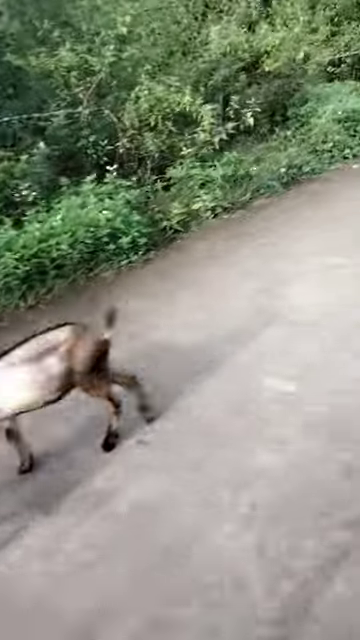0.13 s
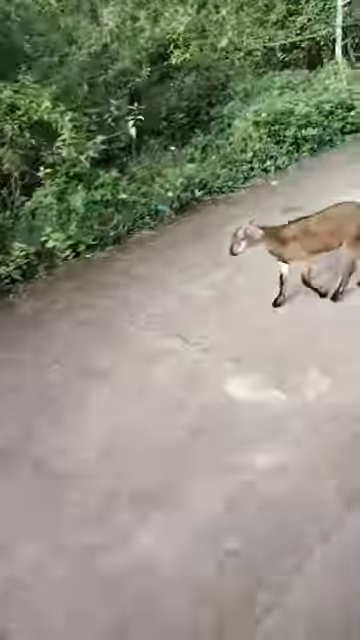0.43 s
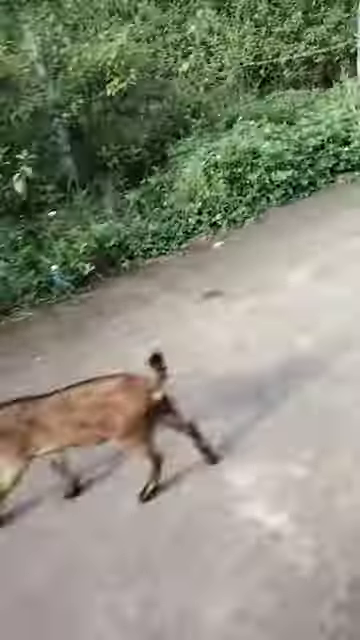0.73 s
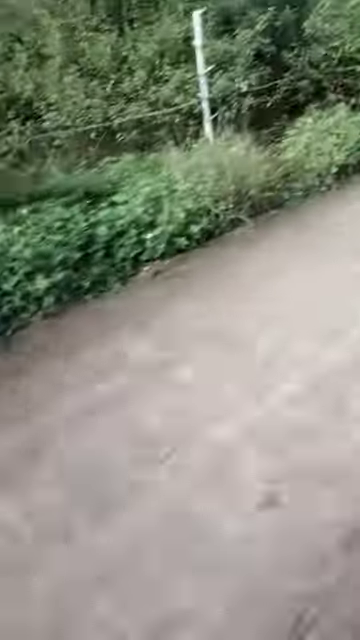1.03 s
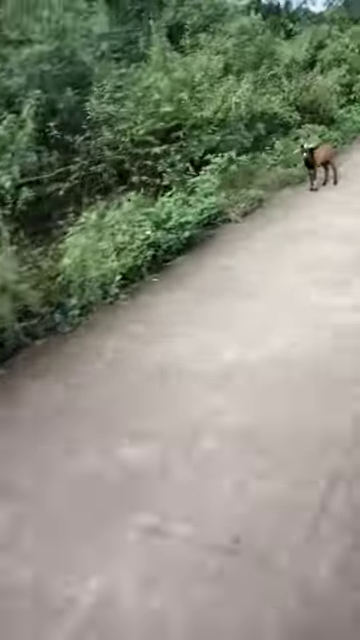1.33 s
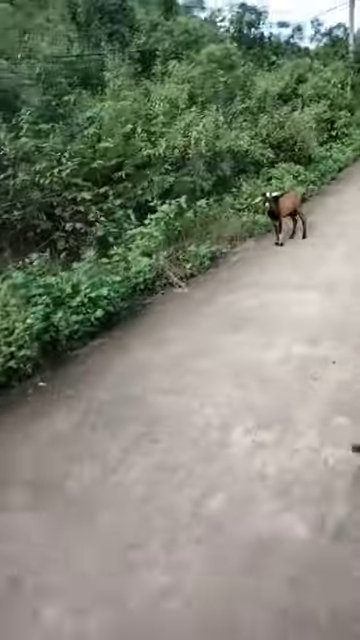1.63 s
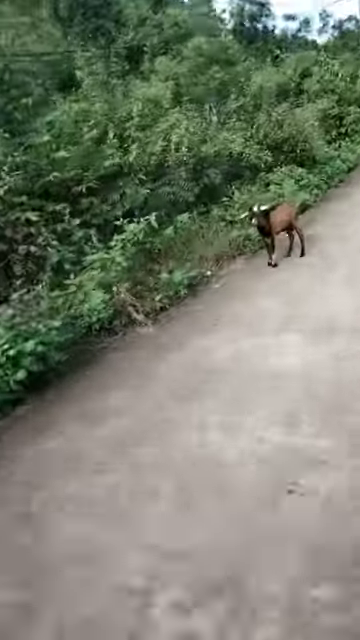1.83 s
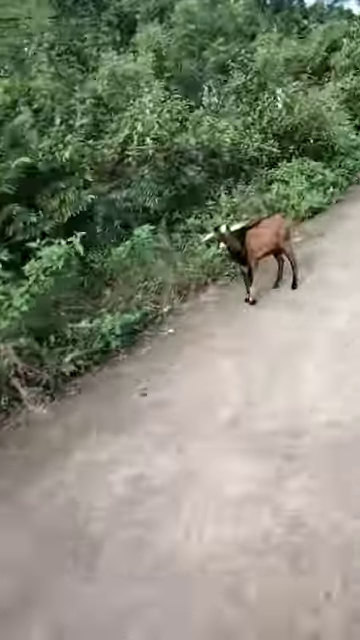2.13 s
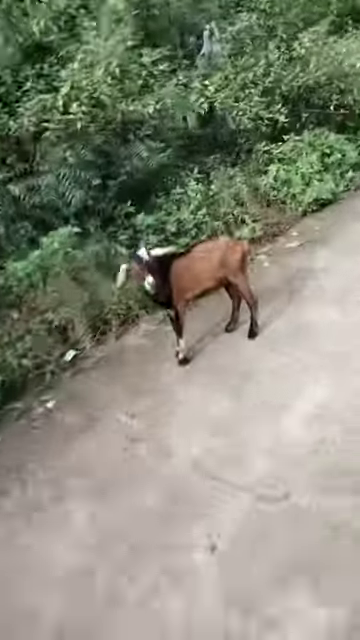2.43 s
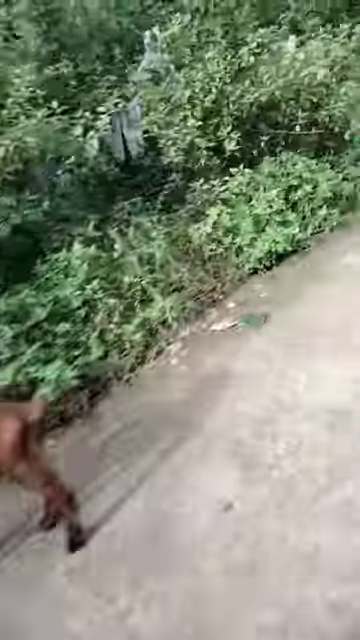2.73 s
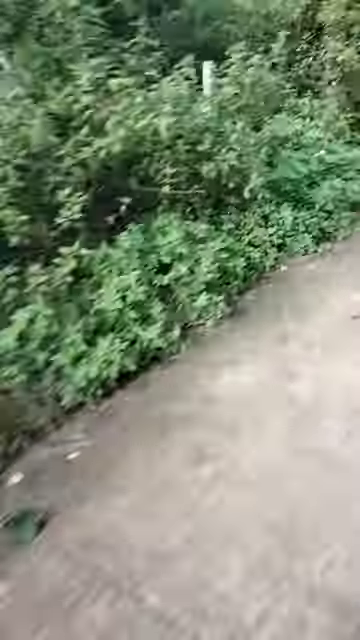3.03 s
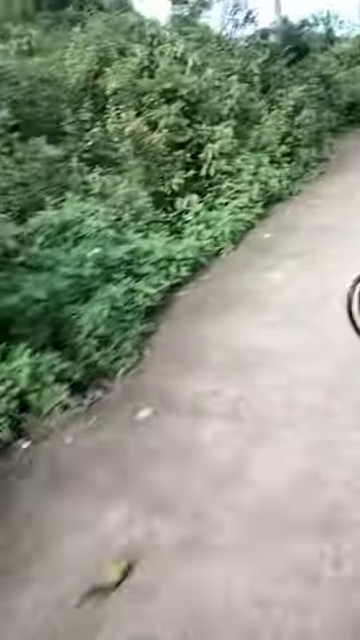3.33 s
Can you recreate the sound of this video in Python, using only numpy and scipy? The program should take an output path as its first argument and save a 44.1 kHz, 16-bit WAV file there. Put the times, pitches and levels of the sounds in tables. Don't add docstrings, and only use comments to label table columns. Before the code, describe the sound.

Wind buffeting, deep and uneven, fills the whole 3.5 seconds at a rider's phone, easing near 0.33, heavier around 0.9-1.4, softer about 1.8-2.5, then strong again from 2.6 with brief snaps. Underneath, a slow motorbike thumps about twenty times a second with faint clatter and gear whine, swelling after 2.6. Tyres hiss thinly; stones tick, clearest near 0.32, 2.14, 2.4 and 3.43.

```python
import sys
import numpy as np
from scipy import signal
from scipy.fft import rfft, irfft
from scipy.io import wavfile
from scipy.ndimage import uniform_filter1d

SR = 44100
rng = np.random.default_rng(int(sys.argv[2]) if len(sys.argv) > 2 else 0)


def master_out(mix):
    frames = np.transpose(np.atleast_2d(mix))
    ceiling = np.clip(frames, -1, 1)
    pcm = np.round(ceiling * 32767).astype(np.int16)
    wavfile.write(sys.argv[1], SR, pcm)


def magnitude_from_level(level_db):
    exponent = np.asarray(level_db, float) / 20
    return 10 ** exponent


N = 153027

# time in seconds, level in dB.
ROLLING = [(.1, -44.5), (.6, -47), (1.0, -44.5), (1.35, -47.5), (1.8, -47), (2.3, -44), (2.8, -44),
           (3.47, -44.5)]
# frequency in Hz, density in dB per Hz.
HISS_COLOUR = [(2500, -13.5), (4300, -20), (5000, -19.5), (7000, -12), (8800, -7), (10800, -13),
               (12500, -16), (15600, -13.5)]
# start in seconds, peak in dB, low ring in dB, length in seconds.
STONES = [(0.308, -31.5, -23, 0.0039), (0.3235, -21, -11.5, 0.0083), (0.332, -38, -13, 0.005),
          (0.613, -37, -10, 0.0051), (0.647, -29, -17, 0.0035), (0.68, -28, -42, 0.0057),
          (0.829, -31, -24, 0.0052), (1.107, -27, -5.5, 0.006), (1.261, -28, -12, 0.0048),
          (1.3763, -26, -4, 0.0089), (1.666, -35, -2, 0.0055), (1.774, -29.5, -5, 0.0034),
          (1.912, -46, 0, 0.005), (2.138, -21.5, -12.5, 0.0064), (2.155, -32, -14, 0.0054),
          (2.315, -29.5, -12, 0.005), (2.333, -28.5, -26, 0.0067), (2.372, -45, -12, 0.0061),
          (2.3993, -19.5, -7.5, 0.0049), (2.846, -37, -27, 0.0045), (3.16, -26.5, -32, 0.0068),
          (3.22, -33, -14, 0.0059), (3.284, -29.5, -12, 0.0068), (3.4302, -24.5, -6, 0.0063)]
# frequency in Hz, width in Hz, level in dB.
EXHAUST_MODES = [
    (45.7, 17, 5),
    (102, 56, 8),
    (140.4, 14, -12.5),
]
# frequency in Hz, width in Hz, level in dB, throb in dB, share of mesh swell.
GEAR_WHINES = [
    (1474, 39, -53.5, 1.5, 0.99),
    (1798, 83, -58.5, -1, 0.61),
    (2204, 72, -60.5, 1.0, 1),
    (4240, 240, -69, 3.5, 0.47),
    (652, 210, -52.5, 2.5, 0.077),
]
# centre in seconds, whine lift in dB, half length in seconds.
MESH_SWELLS = [(1.81, 3, .03), (2.066, 7, .03), (2.598, 4, 0.021), (2.706, 9.5, 0.033), (2.835, 4, 0.0092),
               (3.018, 9, .04), (3.126, 11.5, 0.027), (3.205, 5, 0.021), (3.277, 7, 0.015)]
# frequency in Hz, density in dB per Hz.
CLATTER_COLOUR = [(300, 3.5), (900, 1), (1600, 0.5), (2300, -5), (2600, -4), (4250, -10.5), (4700, -25.5),
                  (7000, -42)]
# time in seconds, exhaust level in dB.
THROTTLE_LEVEL = [(.1, 1.5), (.28, 4), (.4, -3), (.55, 2.5), (.8, -1), (1.3, 0.5), (1.7, -3), (2.0, -0.5),
                  (2.3, -2.5), (2.6, 2.5), (2.9, 2.5), (3.2, 0.5), (3.47, 2.5)]
# time in seconds, level in dB.
LOAD_LEVEL = [(.1, 2), (.6, -0.5), (1.2, 2), (1.7, 1), (2.1, 3), (2.6, 4), (3.0, 2), (3.47, 3.5)]
# time in seconds, level in dB, brightness in dB.
GUSTS = [(.1, -26, -4.5), (.28, -22, -10), (.33, -34, 10), (.45, -25.5, -5.5), (.66, -25, -10.5),
         (.9, -20, -12.5), (1.2, -20.5, 2.5), (1.44, -21.5, -1.5), (1.5, -25, 3), (1.8, -26, 5.5),
         (2.1, -27.5, 7.5), (2.42, -27.5, 5.5), (2.65, -21, -4), (2.9, -20.5, -2), (3.12, -21.5, -3),
         (3.33, -23.5, 2.5), (3.43, -23, 5.5), (3.47, -22.5, -10)]
# centre in seconds, treble lift in dB, bass lift in dB,
# half length in seconds.
PORT_BUFFETS = [(0.117, 8, 0.5, 0.0089), (0.169, 7.5, 2.5, 0.012), (0.261, 6.5, 5, 0.009),
                (0.623, 1.5, 7.5, 0.01), (0.645, 9, 4, 0.014), (0.844, 5.5, -6, 0.008),
                (1.056, 4, 8, 0.011), (1.208, 0, -2.5, 0.005), (1.51, 4, 11.5, 0.008),
                (1.585, 6, 18, 0.0058), (1.756, 4.5, -2, 0.0081), (1.92, 5.5, -15, 0.019),
                (2.023, 6, 0, 0.016), (2.27, 2, 8, 0.0082), (2.464, 3, -1, 0.0062), (2.568, 6, -8, 0.007),
                (3.074, 8.5, -2, 0.0065), (3.185, 7, -2, 0.0047), (3.376, -1, 6.5, 0.0063),
                (3.462, 12, 13, 0.0043), (0.239, 7.5, 4, 0.018), (0.434, 11, 7.5, 0.013),
                (0.72, 5, 5, 0.0067), (0.752, 13.5, 6.5, 0.0087), (0.791, 13.5, 8.5, 0.013),
                (0.929, 4, 6, 0.014), (0.995, 6, 4, 0.02), (1.122, 9, 5, 0.0065), (1.175, 10.5, -3, 0.0073),
                (1.257, 7, 4.5, 0.018), (1.303, 9, -1, 0.0048), (1.339, 11.5, 12, 0.017),
                (1.404, 11, 2.0, 0.0054), (1.431, 12.5, 5, 0.0082), (1.711, 6.5, 5.5, 0.024),
                (1.833, 5.5, 2, 0.021), (2.131, 8, 10.5, 0.018), (2.499, 8.5, 16, 0.015),
                (2.613, 6, 2, 0.022), (2.653, 11.5, 10, 0.009), (2.733, 4.5, 6, 0.012),
                (2.791, 7.5, 10.5, 0.0063), (2.833, 0.5, -0.5, 0.016), (2.865, 7.5, 9, 0.0046),
                (2.971, 5, 7, 0.014), (3.038, 10, 6, 0.013), (3.131, 9, 7, 0.012), (3.207, 7, 1, 0.019),
                (3.261, 11, 9.5, 0.01), (3.303, 9.5, 6.5, 0.0098)]
# start in seconds, peak in dB, length in seconds.
EDDY_SNAPS = [(0.422, -29, 0.0043), (0.713, -35, 0.0045), (0.788, -31, 0.0036), (1.11, -27, 0.005),
              (1.165, -27, 0.0046), (1.249, -32, 0.005), (1.291, -27, 0.0046), (1.332, -27, 0.0055),
              (1.39, -36, 0.0055), (1.427, -21, 0.005), (1.718, -36, 0.0046), (1.829, -30, 0.005),
              (1.915, -28, 0.005), (2.028, -25, 0.005), (2.124, -29, 0.005), (2.572, -28, 0.0059),
              (2.595, -22, 0.005), (2.65, -24, 0.0056), (2.789, -23, 0.0057), (2.96, -29, 0.0059),
              (3.052, -25, 0.0057), (3.182, -37, 0.0043), (3.302, -26, 0.005)]
# frequency in Hz, density in dB per Hz.
WIND_COLOUR = [(10, -9), (22, 0.5), (42, 4), (65, -2.5), (125, -2.5), (300, -11), (500, -17.5),
               (1400, -43.5)]
# frequency in Hz, density in dB per Hz.
EDDY_COLOUR = [(15, 9), (40, 10), (130, 4), (350, -6.5), (800, -21.5), (1500, -63), (3000, -73)]


def noise():
    return rng.standard_normal(N)


def level(x, db):
    return x * magnitude_from_level(db) / np.sqrt(np.mean(x ** 2))


def curve(rows, axis=1):
    rows = np.array(rows)
    return np.interp(np.arange(N) / SR, rows[:, 0], rows[:, axis])


def colour(x, rows):
    hz, db = np.array(rows).T
    f = np.arange(N // 2 + 1) * SR / N + 1
    return irfft(rfft(x) * magnitude_from_level(np.interp(np.log(f), np.log(hz), db)), N)


def band(x, hz, width_hz):
    return signal.lfilter(*signal.iirpeak(hz, hz / width_hz, SR), x)


def even(x, span_s):
    return x / np.sqrt(uniform_filter1d(x ** 2, int(span_s * SR)) + 1e-12)


def walk(rate):
    hold = int(SR / rate)
    steps = np.repeat(noise()[:N // hold + 1], hold)
    w = uniform_filter1d(uniform_filter1d(steps, hold), hold)[:N]
    w = w - uniform_filter1d(w, 4 * hold)
    return w / w.std()


def clicks(rate, spread_db):
    chance, sign, size = rng.random((3, N))
    return (chance < rate / SR) * np.sign(sign - .5) * magnitude_from_level(-spread_db * np.log(size + 0.00079))


def bursts(rows, db, rise):
    t, env = np.arange(N) / SR, np.zeros(N)
    for row, d in zip(rows, db):
        i = int(row[0] * SR)
        u = (t[i:i + SR // 5] - t[i]) / max(row[-1], .001)
        fall = np.exp(-u ** 2.1) + 0.13 * np.exp(-u / 3)
        env[i:i + SR // 5] += magnitude_from_level(d) * (1 - np.exp(-u / rise)) * fall
    return env


def bell(centre_s, half_s):
    return np.exp(-((np.arange(N) / SR - centre_s) / half_s) ** 2)


def port(x):
    shaped = colour(x, [(800, -32)] + list(HISS_COLOUR))
    return shaped + band(shaped, 9000, 1800)


def tyre_hiss():
    grains = np.abs(clicks(rate=280, spread_db=4))
    grit = signal.lfilter([1], [1, -np.exp(-1 / (0.0033 * SR))], grains)
    return level(port(noise()), 0) + level(port(grit * noise()), -4.5)


def stones():
    rows = np.array(STONES)
    peak_db, ring_db = rows[:, 1], rows[:, 1] + rows[:, 2] + 5
    rattle = even(band(port(noise()), 7500.0, 6400.0), 0.0039) * magnitude_from_level(-4.5 + 1.26 * walk(500))
    ring = band(noise(), 1400, 260.0)
    buzz = 0.16 * band(noise(), 3440.0, 860.0)
    ring = even(ring + buzz, 0.0053)
    ticks = rattle * bursts(rows, peak_db, rise=0.17) + ring * bursts(rows, ring_db, rise=1.0)
    return ticks - 0.47 * band(ticks, 5650.0, 1800.0)


def tyres():
    hiss, ticks = tyre_hiss(), stones()
    return hiss * magnitude_from_level(curve(ROLLING) + 0.28 * walk(11.36) + 1.0 * walk(45.19) + 2.0) + ticks


def valve_clatter(phase):
    decay = np.exp(-(phase % 1) / 2.56)
    return level(decay * magnitude_from_level(1.1 * walk(30.18)) * colour(noise(), CLATTER_COLOUR), -45.5)


def gear_whine(phase):
    mesh_db = sum(db * bell(s, max(half, .005)) for s, db, half in MESH_SWELLS)
    out = 0
    for hz, width_hz, db, throb_db, share in GEAR_WHINES:
        tone = even(band(band(noise(), hz, width_hz), hz, 1.05 * width_hz), 0.054)
        throb = throb_db * (walk(25.02) + 1.0 * np.sin(np.pi * phase))
        out = out + level(tone * magnitude_from_level(throb + share * mesh_db), db)
    return out


def exhaust(phase):
    pulses = np.diff(np.floor(phase), prepend=0) * magnitude_from_level(2.5 * walk(25))
    pipe = sum(magnitude_from_level(db) * band(band(pulses, hz, w), hz, w) for hz, w, db in EXHAUST_MODES)
    return level(pipe, -30) * magnitude_from_level(curve(THROTTLE_LEVEL))


def engine():
    firing_hz = 20.21 * (1 + 0.02956 * walk(3))
    phase = np.cumsum(firing_hz) / SR
    thump = exhaust(phase)
    mechanism = valve_clatter(phase) + gear_whine(phase)
    return mechanism * magnitude_from_level(curve(LOAD_LEVEL)) + thump


def turbulence():
    air = colour(noise(), list(WIND_COLOUR) + [(3000, -77)])
    eddies = colour(clicks(rate=120, spread_db=3.5), EDDY_COLOUR)
    return level(air, 0) + level(eddies, -5)


def buffeting():
    gust = curve(GUSTS) - np.mean(curve(GUSTS))
    brightness = curve(GUSTS, axis=2)
    bells = [bell(s, max(half, .004)) for s, _, _, half in PORT_BUFFETS]
    lift_high, lift_low = (1.18 * np.array(PORT_BUFFETS)[:, k] @ bells for k in (1, 2))
    spectrum = rfft(turbulence())
    octaves = np.log2((np.arange(N // 2 + 1) * SR / N + 1) / 16)
    flutter, ripple, out = walk(22.03), walk(50), 0
    for step in range(9):
        high, mid = min(step / 6, 1), np.clip((step - 2) / 2, 0, 1)
        gust_gain = 1 + (1.99 - 1) * high
        db = gust_gain * gust + high ** 2 * brightness
        db = db + (1 - mid) * lift_low + (mid + 0.29 * high ** 3) * lift_high
        db = db + (0.25 + 0.26 * high) * flutter + (0.5 + 2.0 * high) * ripple + 0.6 * walk(14)
        window = np.cos(np.pi / 2 * np.clip(octaves - step, -1, 1)) ** 2
        part = irfft(spectrum * window, N)
        out = out + magnitude_from_level(db) * part.std() * even(part, 0.035 + 0.091 * (1 - mid))
    return level(out, -19.5)


def snaps():
    snap_hz = 845
    crack = even(band(band(noise(), snap_hz, 1200.0), snap_hz, 1800.), 0.0027)
    crack = signal.sosfilt(signal.butter(4, 1900, fs=SR, output="sos"), crack)
    return crack * bursts(EDDY_SNAPS, np.array(EDDY_SNAPS)[:, 1] - 7.5, rise=0.23)


def wind():
    return buffeting() + snaps()


def scene():
    return (wind() + tyres() + engine())[None, :]


def low_pass(x):
    return signal.sosfilt(signal.butter(12, 16610, fs=SR, output="sos"), x)


def record(dry):
    start_s, fade_s, limit, top_hz = 0.086, 0.0093, 0.48, 15480
    fade = np.clip((np.arange(N) / SR - start_s) / fade_s, 0, 1)
    soft = limit * np.tanh(dry * fade / limit)
    mix = signal.sosfilt(signal.ellip(12, .3, 90, top_hz, fs=SR, output="sos"), soft)
    return low_pass(mix)


dry = scene()
out = record(dry)
master_out(out)
```